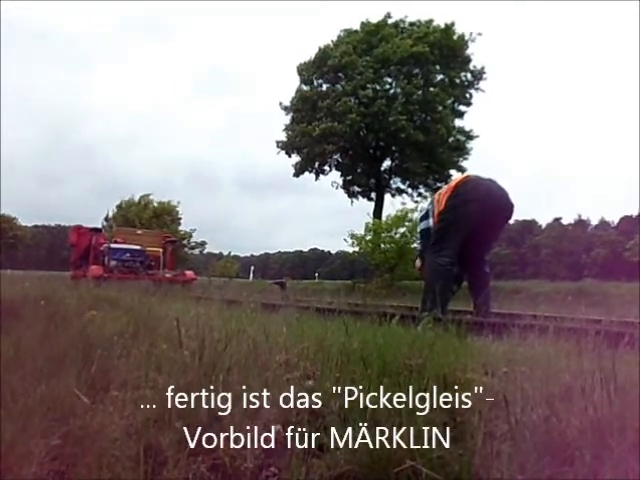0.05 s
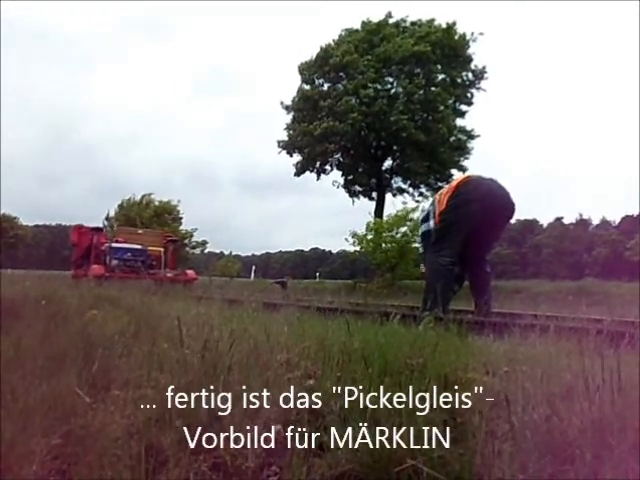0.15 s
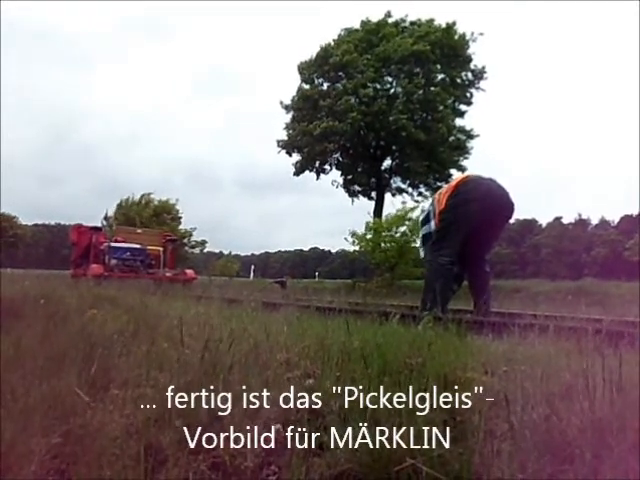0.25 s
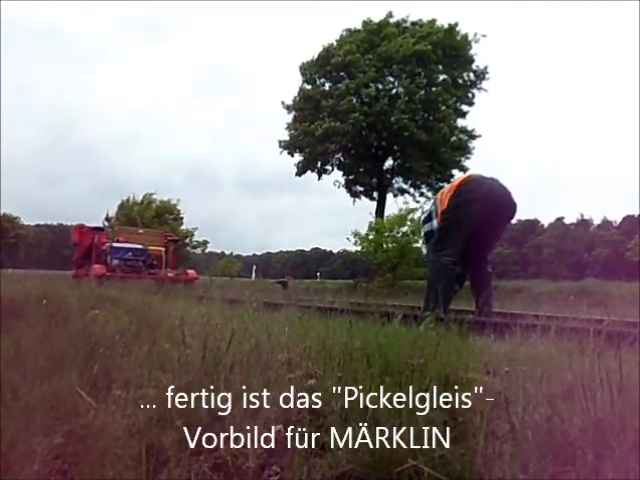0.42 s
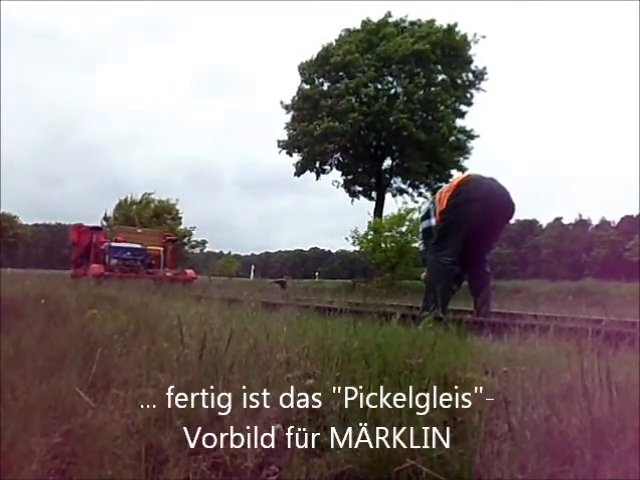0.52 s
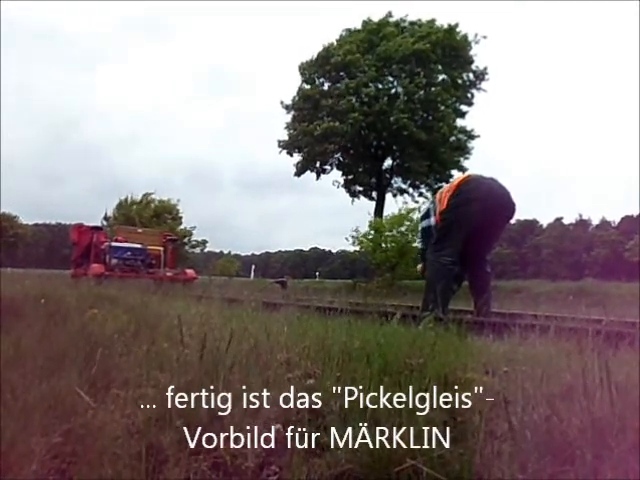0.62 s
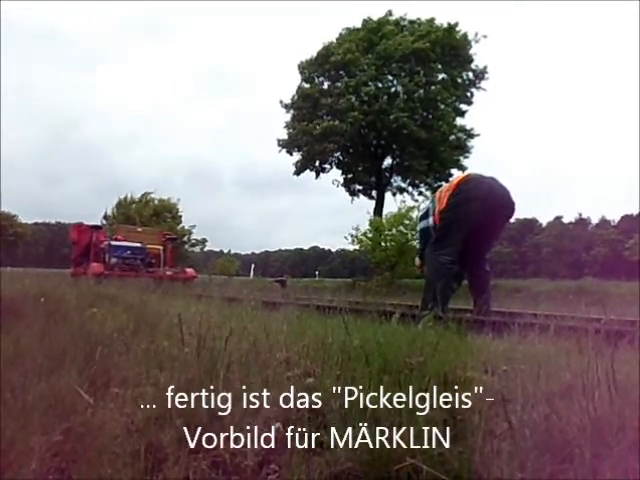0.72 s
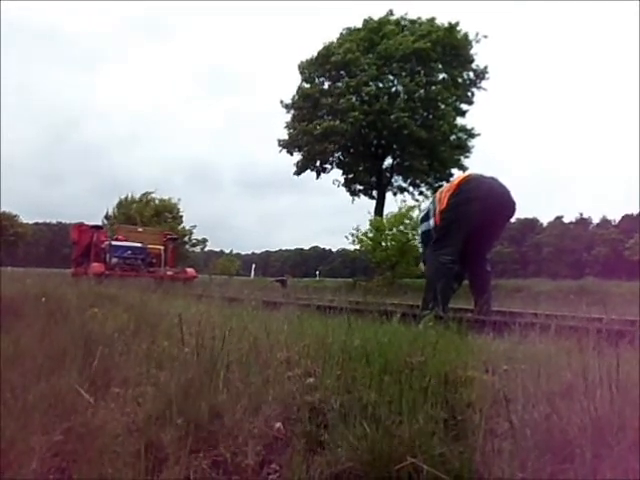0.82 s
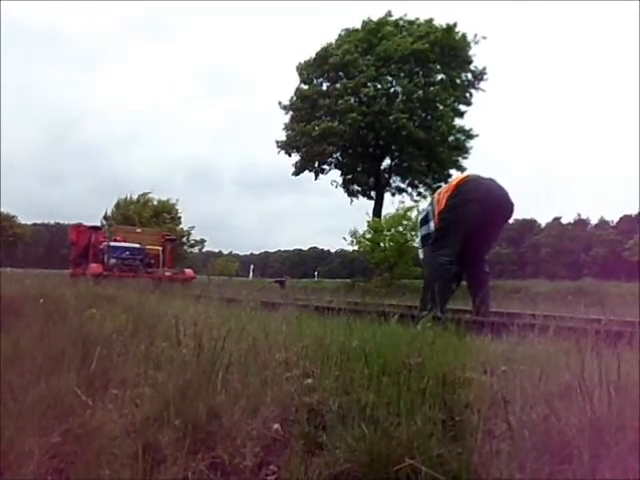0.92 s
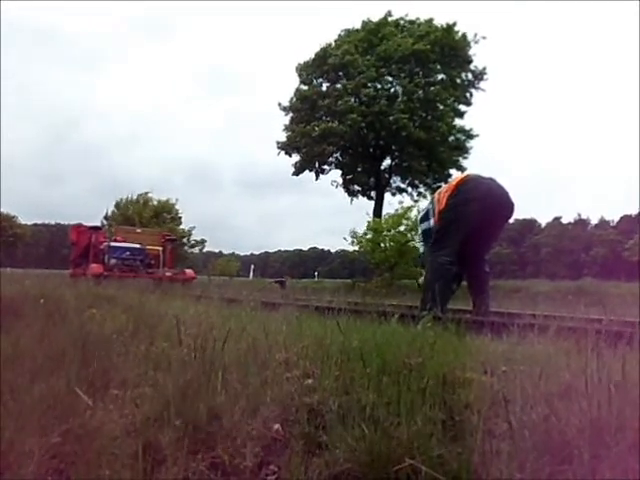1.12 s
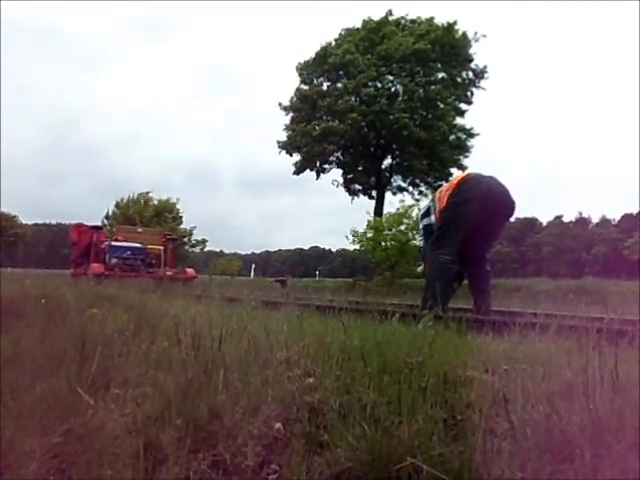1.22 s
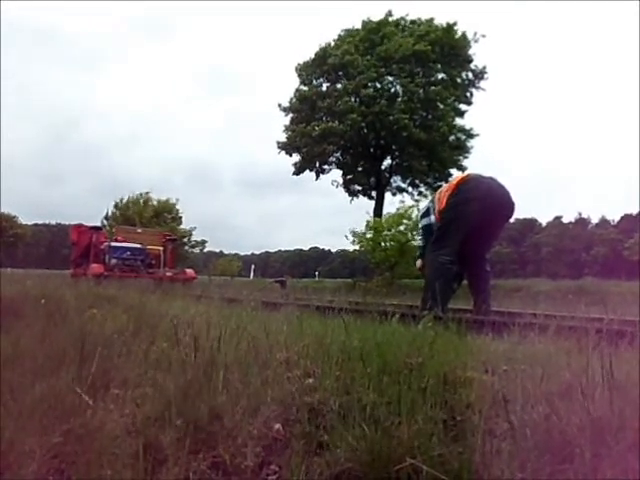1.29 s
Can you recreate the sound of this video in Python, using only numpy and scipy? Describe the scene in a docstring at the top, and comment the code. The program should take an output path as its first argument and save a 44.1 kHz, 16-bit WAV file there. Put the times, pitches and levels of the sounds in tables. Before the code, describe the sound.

A hand tool strikes a steel rail twice, at about 0.2 and 0.9 seconds. Each blow is a sharp crack with a hollow knock and a very short metallic ring, slightly overloading the microphone and leaving a faint outdoor echo. Light wind hisses throughout and softly bumps the microphone around 0.5 seconds. Faint, distant bird chirps come at the very start and near 0.4 seconds.

```python
"""A hand tool strikes the steel of a railway track twice, in open grassland.
Each blow is a contact crack, a hollow knock of the sleeper and a short steel ring that together
overload the microphone; track bed and trees scatter the sound back.
Light wind hisses and bumps the microphone, and small birds call far off."""
import sys
import numpy as np
from scipy import signal
from scipy.fft import irfft
from scipy.io import wavfile

SR = 44100
rng = np.random.default_rng(int(sys.argv[2]) if len(sys.argv) > 2 else 0)


def unload_wav(signal):
    """Save mono or channel-first audio to the path in sys.argv[1] as 16-bit WAV at rate SR, clipped to [-1, 1]."""
    wavfile.write(
        sys.argv[1],
        SR,
        np.round(np.clip(np.atleast_2d(signal).T, -1, 1) * 32767).astype(np.int16),
    )


N = 59535
TIME_S = np.arange(N) / SR
BAND_EDGE_HZ = 5280

# Wind hiss. Each row: frequency in Hz, relative density in dB.
HISS_SPECTRUM = [(88, -49), (150, -11.5), (211, -2.5), (323, -4), (364, -5), (434, -5), (749, -2.5),
                 (1690, -6), (3970, -8), (5100, -11.5), (6630, -2), (11200, -120)]
# Low buffeting. Each row: frequency in Hz, relative density in dB.
BUFFET_SPECTRUM = [(15, 0), (35, -2), (70, -7), (130, -13.5), (250, -32.5), (600, -61)]
# Wind on the microphone. Each row: time in seconds, level in dB.
GUST_LEVELS = [(0, -44.5), (.15, -52.5), (.378, -49.5), (.414, -37.5), (.46, -44), (.482, -34.5),
               (.52, -31.5), (.566, -43), (.62, -42.5), (.67, -50.5), (.73, -60), (.81, -45), (1.0, -52),
               (1.15, -58.5), (1.22, -46.5), (1.26, -44.5), (1.35, -49)]
# Bird calls. Each row: start and length in seconds, start and end pitch in Hz, level in dB.
BIRD_CALLS = [(.014, .042, 4650, 3850, -48), (.09, .06, 3600, 2650, -53), (.425, .052, 4570, 4520, -50)]
# Blows, each on its own spot. Each row: start in seconds, gain in dB, extra crack gain in dB.
TOOL_BLOWS = [(.2087, -2, -1.5), (.8693, -3, 4.5)]
# Contact crack. Each row: frequency in Hz, relative density in dB for blow 1 and for blow 2.
CRACK_SPECTRA = [(200, 2, 3), (600, -12.5, -19), (1240, -1, 1.5), (2040, -8, -0.5), (2630, 5.5, -1.5),
                 (3140, -9, 1), (3940, -12, 5), (4540, -20, -28), (4470, 6, -0.5), (4850, -7, 6.5)]
# Sleeper modes. Each row: frequency in Hz, level in dB, T60 in seconds.
SLEEPER_MODES = [(158.7, -4.5, 0.038), (345, -30, 0.24), (383.2, 0, 0.042), (529.5, 10, .018),
                 (549.4, 1, 0.058), (727, -21.5, 0.073), (904, -15, 0.057), (991, -19, 0.062)]
# Steel modes. Each row: frequency in Hz, T60 in seconds, level in dB for blow 1 and for blow 2.
STEEL_MODES = [(1318, 0.035, -21, -8.5), (1822, 0.039, -11, -7.5), (2067, 0.013, -10, -1),
               (2450, 0.026, -17.5, -9), (2788, 0.02, 3.5, -1.5), (3167, 0.024, -10.5, -4),
               (3320, .05, -16, -30), (3632, 0.024, -4, -13), (3815, 0.033, -10, -5.5),
               (4307, 0.043, -25, -29), (4378, 0.057, -14.5, -37), (4785, 0.047, -11.5, -34),
               (4980, 0.012, -2, 7)]
# Ground shake. Each row: frequency in Hz, relative density in dB.
THUD_SPECTRUM = [(30, -20), (90, -2), (165, 6.5), (260, 0), (380, -14), (800, -30)]
# Ballast scatter. Each row: frequency in Hz, relative density in dB for blow 1 and for blow 2.
SCATTER_SPECTRA = [(89.3, -14, -11), (348, 10.5, 11), (580, 13.5, -2), (740, -4, -9), (1290, -15, -2),
                   (1940, -8, 3), (2176, -7, 2), (2550, 6, -8), (3260, -4, -1), (3630, -3, -16),
                   (4040, -3, 10.5), (4500, -11, -13), (4900, -5, -4), (5400, -2, 4)]
# Track side and tree echoes. Each row: delay and spread in seconds, level in dB, width in Hz,
# centre in Hz for blow 1 and for blow 2.
ECHO_BANDS = [(0.034, 0.0043, -26, 128, 4540, 4110), (.038, 0.0031, -30, 1190, 2600, 2000),
              (.066, 0.0098, -37, 388, 4500, 4020), (0.122, 0.027, -40, 700, 4520, 3515)]


def from_db(db):
    """Decibels to gain."""
    return 10 ** (np.asarray(db) / 20)


def noise(spectrum):
    """Band-limited noise of rms 1, shaped by (Hz, dB) points."""
    hz, db = np.transpose(spectrum)
    bins_hz = np.maximum(np.fft.rfftfreq(N, 1 / SR), 1)
    gain = from_db(np.interp(np.log(bins_hz), np.log(hz), db)) * (bins_hz < BAND_EDGE_HZ * 1.1)
    x = irfft(gain * np.exp(2j * np.pi * rng.random(len(bins_hz))), N)
    return x / x.std()


def decay(age_s, t60_s):
    """Exponential decay from age zero."""
    return (age_s >= 0) * np.exp(-np.log(1000) * np.maximum(age_s, 0) / t60_s)


def bell(age_s, peak_s, spread_s):
    """Gaussian envelope."""
    return np.exp(-.5 * ((age_s - peak_s) / spread_s) ** 2)


def contact_rise(age_s, rise_s=0.00041):
    """Smooth build-up on contact."""
    return (1 - np.exp(-np.maximum(age_s, 0) / rise_s)) ** 2


def ring(age_s, modes):
    """Struck modes of alternating sign."""
    return sum((-1) ** k * from_db(db) * decay(age_s, t60_s) * np.sin(2 * np.pi * hz * age_s)
               for k, (hz, db, t60_s) in enumerate(modes))


def low_pass(x, hz):
    """Steep zero-delay low-pass."""
    taps = signal.firwin(301, hz, window=("kaiser", 9), fs=SR)
    return signal.fftconvolve(x, taps[None], "same")


def wind():
    """Steady hiss over the field, low buffets on the microphone."""
    gust_db = np.interp(TIME_S, *np.transpose(GUST_LEVELS))
    return from_db(-47) * noise(HISS_SPECTRUM) + from_db(gust_db) * noise(BUFFET_SPECTRUM)


def birds(waver_rms_hz=80):
    """Faint falling whistles with a random waver."""
    out = np.zeros(N)
    for start_s, length_s, start_hz, end_hz, db in BIRD_CALLS:
        progress = np.clip((TIME_S - start_s) / length_s, 0, 1)
        hz = start_hz + (end_hz - start_hz) * progress + waver_rms_hz * noise(BUFFET_SPECTRUM)
        envelope = np.sqrt(np.abs(np.sin(np.pi * progress)))
        out += from_db(db) * envelope * np.sin(2 * np.pi * np.cumsum(hz) / SR)
    return out


def rail_forerunner(age_s, lead_s=0.0025, hz=1080):
    """Bending waves in the rail arrive just before the blow."""
    progress = np.clip(age_s / lead_s + 1, 0, 10)
    envelope = progress * np.exp(1 - progress ** 2)
    return from_db(-18) * envelope * np.sin(2 * np.pi * hz * age_s)


def contact_crack(age_s, spot, gain_db):
    """Tool meets rail: a brief noise burst."""
    envelope = bell(age_s, peak_s=0.0025, spread_s=0.0017) * contact_rise(age_s)
    spectrum = [(hz, db[spot]) for hz, *db in CRACK_SPECTRA]
    return from_db(gain_db - 1.5) * envelope * noise(spectrum)


def sleeper_knock(age_s):
    """Low sleeper modes give a hollow knock."""
    return -ring(age_s, SLEEPER_MODES)


def steel_ring(age_s, spot):
    """Short ring; the struck spot sets the mode levels."""
    modes = [(hz, db[spot], t60_s) for hz, t60_s, *db in STEEL_MODES]
    return ring(age_s, modes) * contact_rise(age_s)


def ground_thud(age_s):
    """Dull after-shake of the ground."""
    return from_db(-26) * decay(age_s, t60_s=0.21) * noise(THUD_SPECTRUM)


def ballast_scatter(age_s, spot):
    """Diffuse return from the ballast, dying quickly."""
    spectrum = [(hz, db[spot]) for hz, *db in SCATTER_SPECTRA]
    return from_db(-14) * decay(age_s, t60_s=0.11) * noise(spectrum)


def echoes(age_s, spot):
    """Track side and trees return the ring, smeared into noise bands."""
    out = np.zeros(N)
    hz = np.geomspace(300, BAND_EDGE_HZ, 200)
    for delay_s, spread_s, db, width_hz, *centre_hz in ECHO_BANDS:
        band_db = -10 * np.log10(1 + (2 * (hz - centre_hz[spot]) / width_hz) ** 2)
        out += from_db(db) * bell(age_s, delay_s, spread_s) * noise(np.c_[hz, band_db])
    return out


def scene():
    """Two blows with their echoes, over wind and birds."""
    out = wind() + birds()
    for spot, (start_s, gain_db, crack_db) in enumerate(TOOL_BLOWS):
        age_s = TIME_S - start_s
        blow = rail_forerunner(age_s) + contact_crack(age_s, spot, crack_db)
        blow += sleeper_knock(age_s) + steel_ring(age_s, spot) + ground_thud(age_s)
        out += from_db(gain_db) * (blow + ballast_scatter(age_s, spot) + echoes(age_s, spot))
    return out[None]


def record(dry, overload_level=1.125, gain_db=1.85, dc_offset=0.015):
    """Soft input overload, narrow band, hard clip at full scale, final low-pass."""
    overloaded = overload_level * np.tanh(dry / overload_level)
    narrow = low_pass(overloaded, BAND_EDGE_HZ)
    clipped = np.clip(from_db(gain_db) * narrow + dc_offset, -1, 1)
    return low_pass(clipped, hz=15800)


dry = scene()
out = record(dry)
unload_wav(out)
```